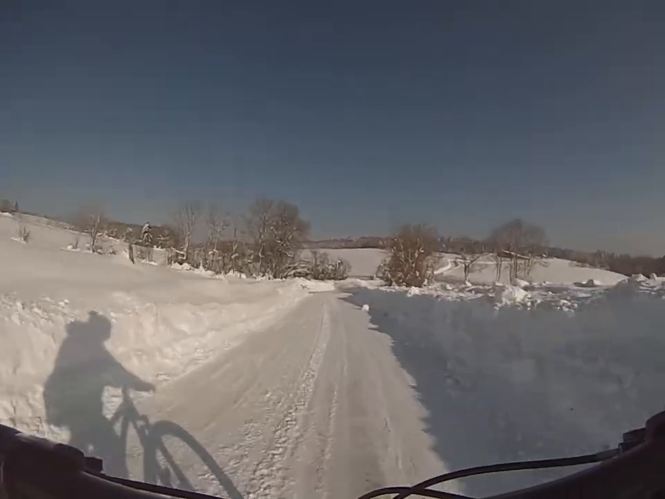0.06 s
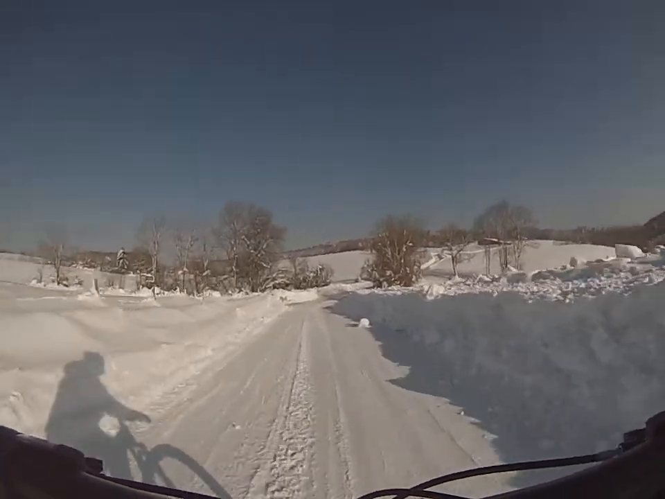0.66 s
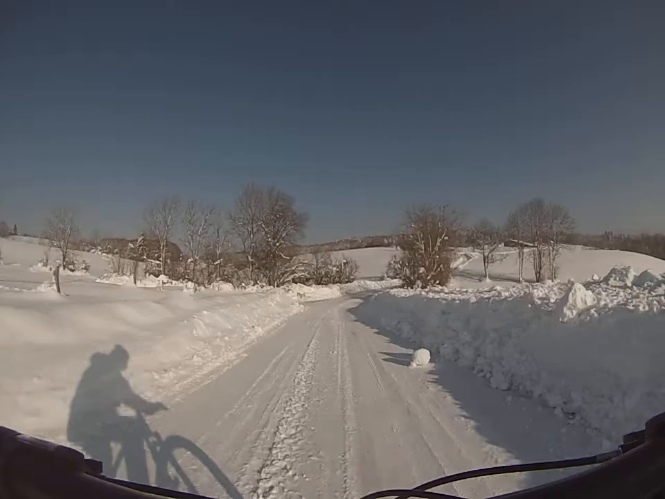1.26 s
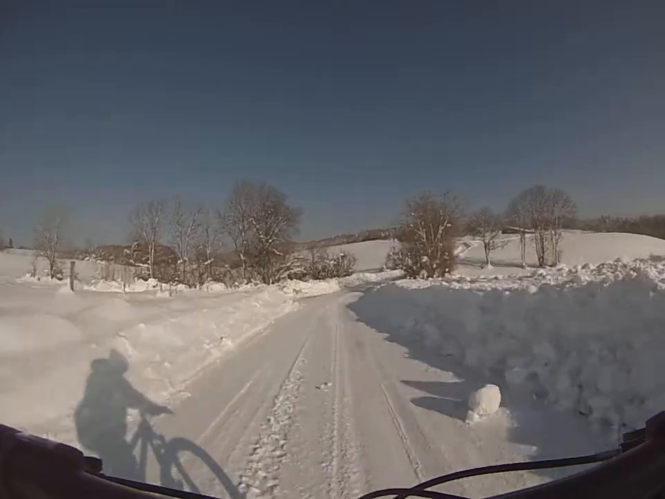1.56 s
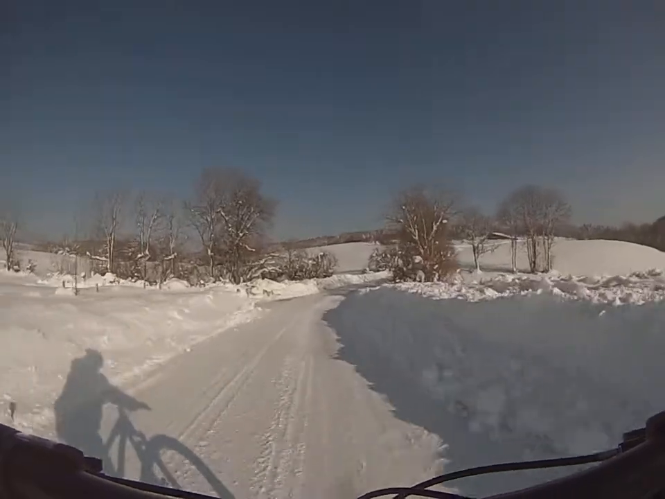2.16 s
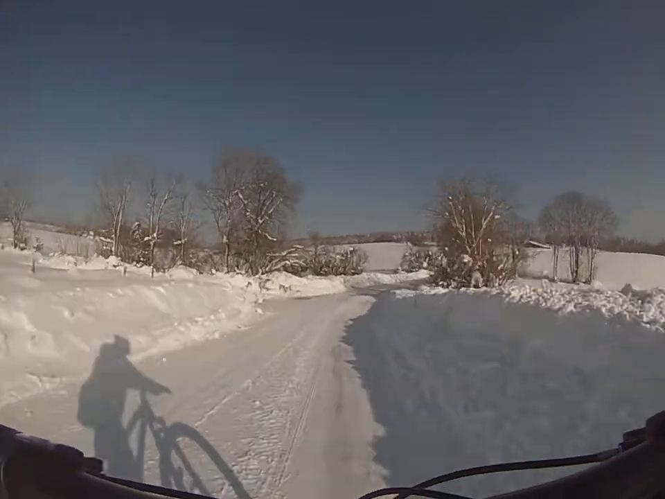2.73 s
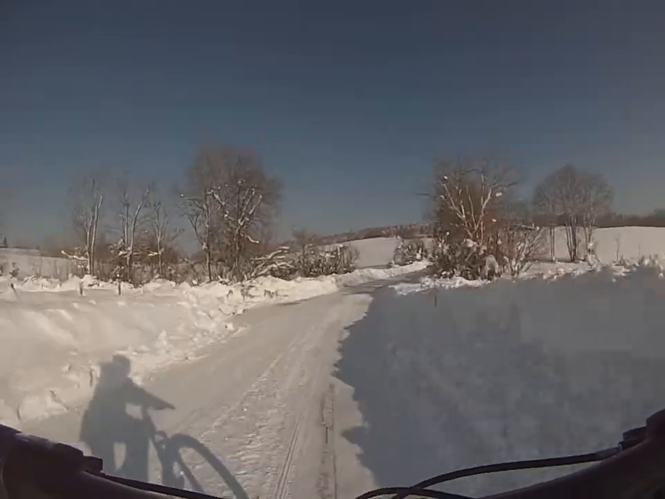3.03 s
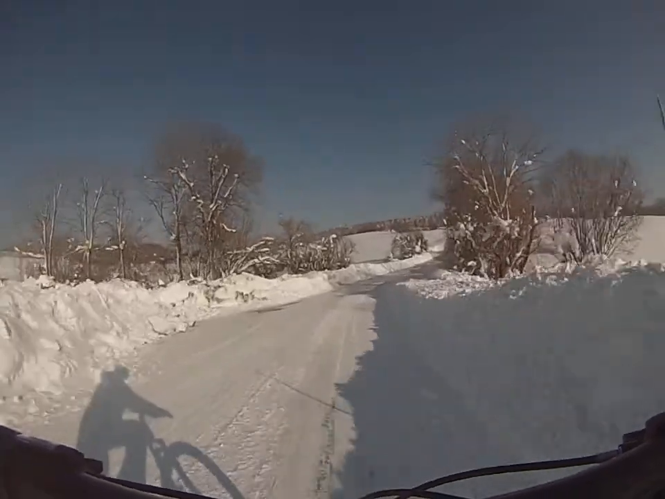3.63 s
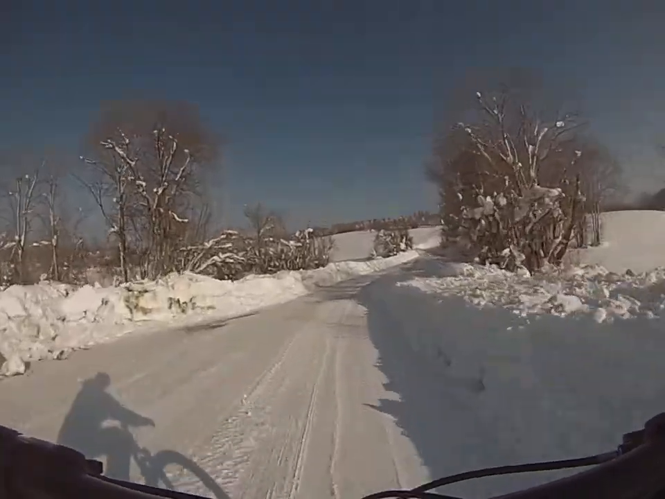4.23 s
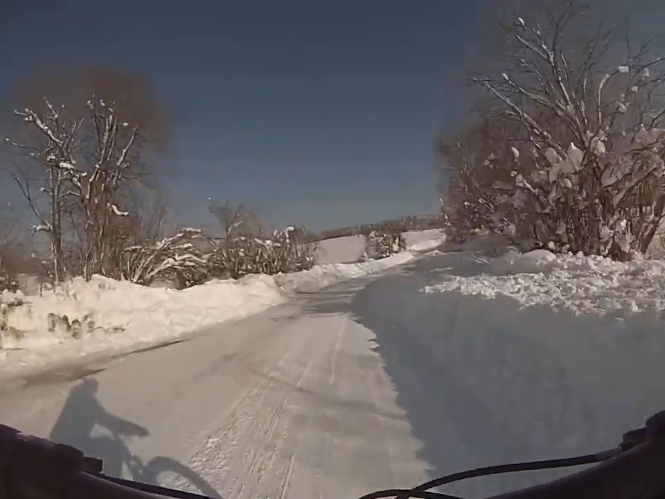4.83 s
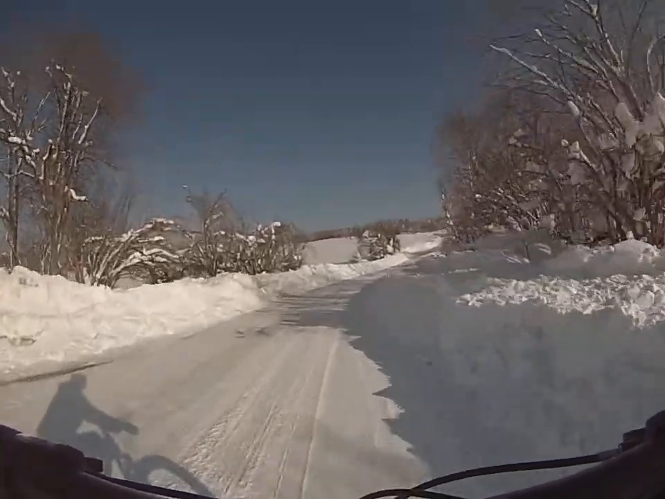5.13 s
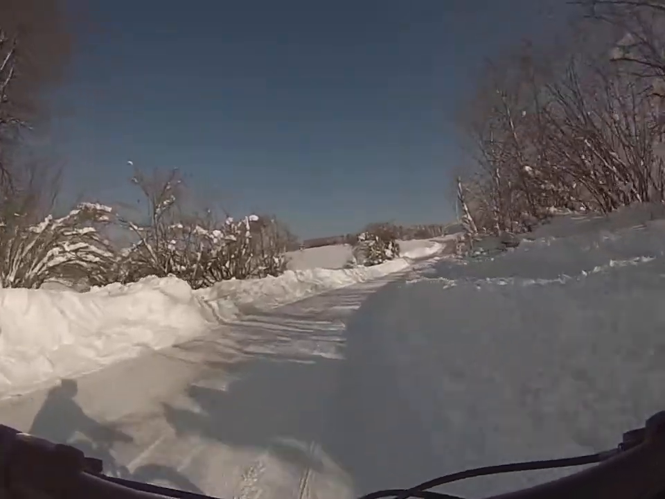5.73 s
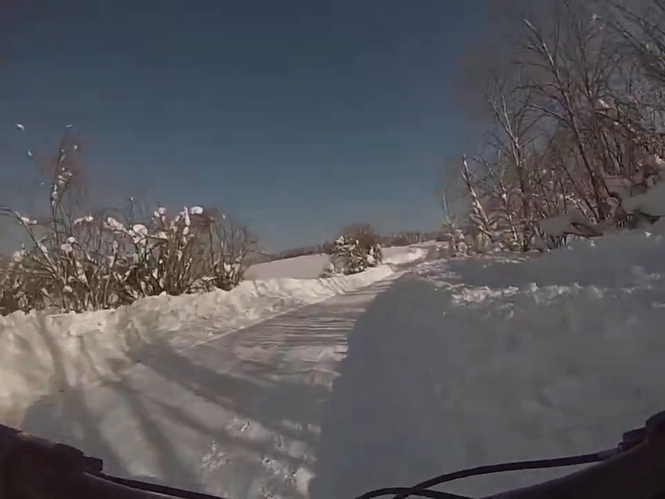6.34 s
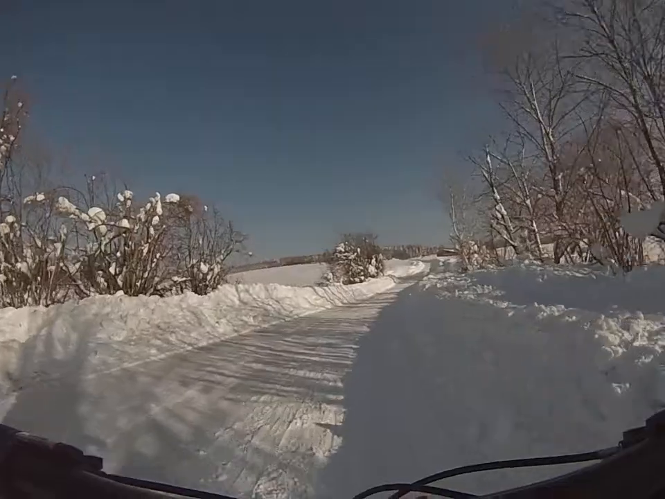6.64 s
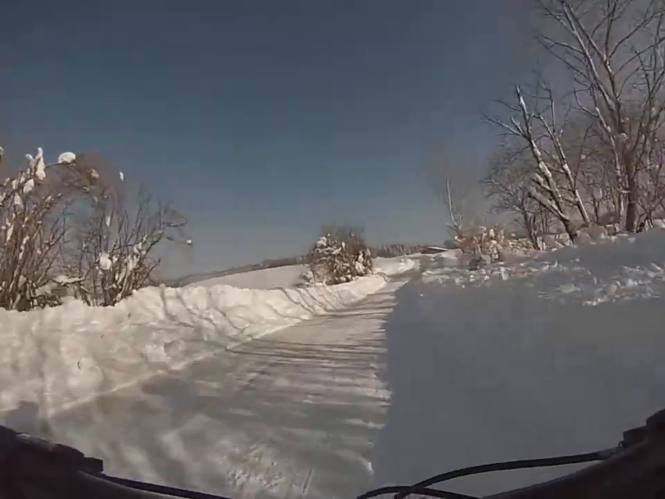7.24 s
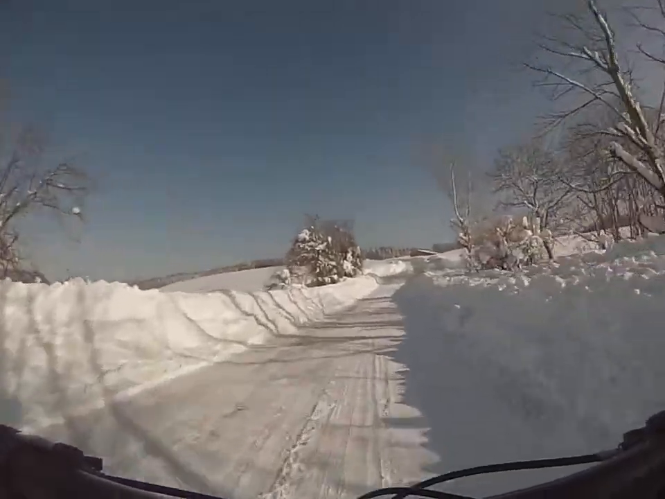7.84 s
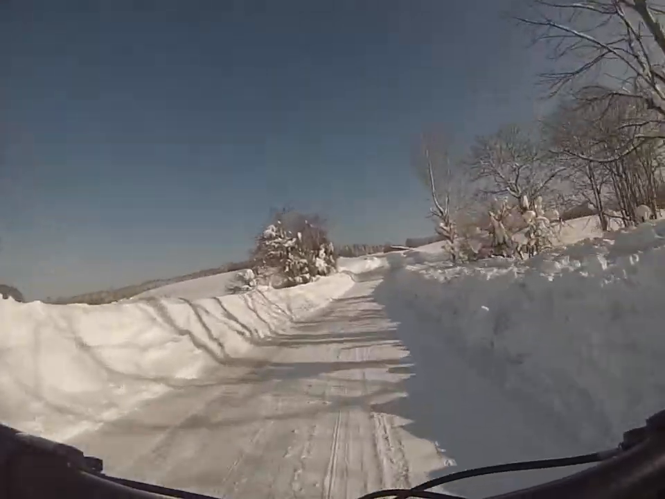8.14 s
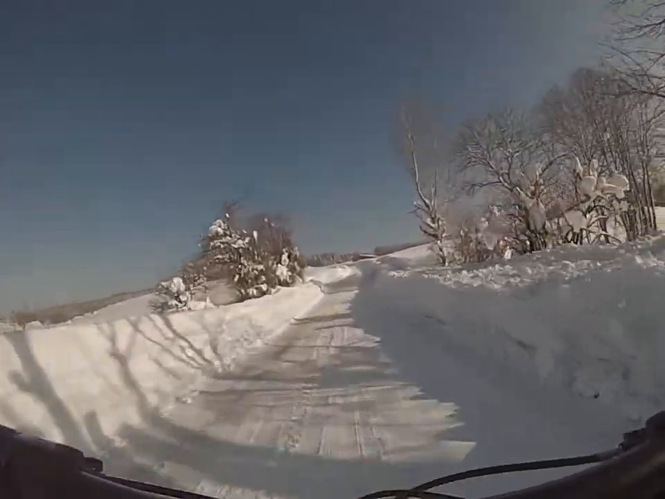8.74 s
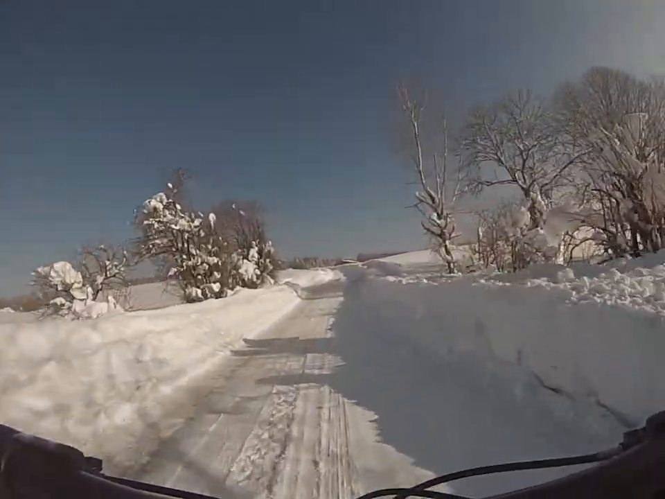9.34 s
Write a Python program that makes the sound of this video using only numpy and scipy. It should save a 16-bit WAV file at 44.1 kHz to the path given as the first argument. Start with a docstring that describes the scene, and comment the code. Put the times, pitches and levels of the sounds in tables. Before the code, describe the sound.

A bicycle rolls over packed snow for about nine and a half seconds, heard from a mount on its handlebar. A loud, low rumble runs from start to finish, with a deep, fast shudder that swells in closely spaced bouts. The plastic mount creaks on the stronger shakes and gives a few sharp ticks. Beneath this are a wavering tyre hum, soft crunching snow and a constant light chatter of fittings. Loose metal jingles irregularly, most clearly near 0.2, 1.8, 3.6 and 5 seconds. Cables and levers clack dryly, hardest around 0.2, 7, 8.3 and 9.5 seconds. Ruts give dull thuds at roughly 0.8, 3.6, 4.6, 5.4, 6.6, 7.5 and 9.4 seconds. Just before 6 seconds the tyre hum briefly rises in pitch, then settles as the ride carries on.

```python
"""A bicycle rolls over packed snow, heard from a housing mounted on its handlebar.
From the start the rough track drives the mount into bouts of oscillation near 33 Hz, and stick-slip
friction makes its joint creak on the wide swings. Beneath this the housing rumbles, tyre and fork hum
and snow crunches through the frame. Within the first second loose metal jingles, fittings knock, the
joint snaps and a rut gives a thud; all recur irregularly. Near 6 s the tyre hum briefly rises in pitch."""
import sys
import numpy as np
from scipy import signal
from scipy.fft import rfft, irfft, next_fast_len
from scipy.io import wavfile
from scipy.ndimage import uniform_filter1d

SR = 44100
rng = np.random.default_rng(int(sys.argv[2]) if len(sys.argv) > 2 else 0)


def dump_mix(stems):
    """Bounce the given channels to the path in sys.argv[1] as a 16-bit WAV at rate SR."""
    frames = np.atleast_2d(stems).T  # one column per channel
    limited = np.clip(frames, -1, 1)  # hard clip at full scale
    pcm = np.round(limited * 32767).astype(np.int16)
    wavfile.write(sys.argv[1], SR, pcm)


N = 422919


def from_db(db):
    """Decibels to amplitude ratio."""
    return 10 ** (np.asarray(db) / 20)


def rms_one(x):
    """Normalisation to unit rms."""
    return x / np.sqrt(np.mean(x ** 2) + 1e-20)


def in_time(rows):
    """Linear interpolation of (time, value) rows at every sample."""
    return np.interp(np.arange(N) / SR, *np.transpose(rows))


def drift(hz):
    """Low-passed Gaussian noise: a slow fluctuation of unit rms."""
    step, settling = 40, 2000
    pole = np.exp(-2 * np.pi * step * hz / SR)
    noise = rng.standard_normal(N // step + settling + 2)
    slow = signal.lfilter([1], [1, -2 * pole, pole * pole], noise)[settling:]
    return np.interp(np.arange(N) / step, np.arange(len(slow)), rms_one(slow))


def coloured(x, spectrum):
    """Minimum-phase filtering to a given spectrum, by folding the cepstrum."""
    size = next_fast_len(N + SR, True) // 2 * 2
    hz, db = np.transpose(spectrum)
    grid = np.arange(size // 2 + 1) * SR / size
    gain = from_db(np.interp(np.log(grid + 1), np.log(hz), db))
    cepstrum = irfft(np.log(gain))
    cepstrum[1:size // 2] *= 2
    cepstrum[size // 2 + 1:] = 0
    return irfft(rfft(x, size) * np.exp(rfft(cepstrum)))[:N]


def cut(x, hz, kind, order=2):
    """Butterworth low- or high-pass."""
    return signal.sosfilt(signal.butter(order, hz, kind, fs=SR, output="sos"), x + 1e-18)


def resonance(x, hz, width):
    """A damped oscillator with unit gain at resonance."""
    r = np.exp(-np.pi * width / SR)
    feedback = [1, -2 * r * np.cos(2 * np.pi * hz / SR), r * r]
    return signal.lfilter(np.array([1, 0, -1]) * (1 - r * r) / 2, feedback, x + 1e-18)


def body(force, modes):
    """Modal superposition: every contact drives each mode with a random strength and sign."""
    return sum(from_db(db) * resonance(force * rng.standard_normal(len(force)), hz, width)
               for hz, width, db in modes)


def grains(per_s, spread_db):
    """A Poisson process of impulses of uneven size."""
    sizes = from_db(spread_db * np.clip(rng.standard_normal(N), -2, 2))
    return (rng.random(N) < per_s / SR) * sizes


def fading(clicks, decay_s):
    """Exponential decay after each impulse."""
    return signal.lfilter([1], [1, -np.exp(-1 / (decay_s * SR))], clicks + 1e-18)


def evened(x, span_s):
    """Division by the running rms steadies the level and keeps finer detail."""
    size = int(span_s * SR)
    power = uniform_filter1d(uniform_filter1d(x ** 2, size), size)
    return x / np.sqrt(np.abs(power) + np.mean(x ** 2) / 100)


def blows(events, respond, peak_samples=480):
    """Impulse responses, each scaled to the peak level of its event."""
    starts = [int(s * SR) for s, db in events]
    clicks = np.zeros(N)
    clicks[starts] = 1
    sound, gain = respond(clicks), np.zeros(N)
    for start, (s, db) in zip(starts, events):
        gain[start:] = from_db(db) / np.abs(sound[start:start + peak_samples]).max()
    return sound * gain


# Bouts of bouncing: (start [s], end [s], relative swing level [dB], relative creak level [dB])
BOUNCE_BOUTS = [(-0.054, 0.042, -8.0, -53), (0.244, 0.931, -10.5, -59.5), (1.215, 1.577, -9.0, -56),
                (1.625, 1.691, -11, -54), (1.918, 2.189, -8.5, -58.5), (2.244, 2.414, -8.5, -56.5),
                (2.476, 2.737, -9.0, -56), (2.819, 2.912, -9.5, -57.5), (2.988, 3.467, -10.0, -56),
                (3.527, 4.448, -11.0, -57), (4.485, 4.681, -9, -55.5), (4.767, 5.025, -9.5, -57.5),
                (5.258, 5.682, -9.5, -56.5), (5.703, 5.947, -10, -59.5), (6.035, 6.346, -9.5, -59),
                (6.365, 6.562, -9, -56.5), (6.599, 7.928, -10, -56.5), (8.044, 8.388, -9, -60),
                (8.481, 8.804, -10, -62), (8.811, 9.366, -11.5, -58), (9.379, 9.528, -12, -59)]
def bouts(build_s=0.044, decay_s=0.055, creak_power=8.7):
    """Envelopes of a driven, damped oscillation and of its creak, which grows steeply with the swing."""
    t = np.arange(N) / SR
    swing, creaking = from_db(-16.5), from_db(-67.5)   # floors between bouts
    for start, end, swing_db, creak_db in BOUNCE_BOUTS:
        shape = np.clip((t - start) / build_s, 0, 1) * np.exp(-np.clip((t - end) / decay_s, 0, 10))
        swing = np.maximum(swing, from_db(swing_db) * shape)
        creaking = np.maximum(creaking, from_db(creak_db) * shape ** creak_power)
    return swing, creaking


# Bumps out of step that briefly check the swing: (time [s])
SWING_CHECKS = [0.631, 0.801, 0.959, 1.129, 1.651, 2.049, 5.071, 5.14, 6.201, 6.561, 7.02, 7.41, 7.48, 8.44,
                8.68]
def bounce(level, hz=32.8, check_s=0.022, check_db=-10):
    """Resonance: the mount swings near its natural frequency, losing step when the swing is weak."""
    t = np.arange(N) / SR
    checked = sum(np.exp(-np.minimum(((t - s) / check_s) ** 2, 20)) for s in SWING_CHECKS)
    swing = level * from_db(0.65 + 0.8 * drift(12) + check_db * checked)
    weakness = np.clip(np.median(swing) / swing, 0, 2) ** 2
    rate = hz * (1 + 0.06 * drift(3) + 0.1 * weakness * drift(15))
    phase = 2 * np.pi * np.cumsum(rate) / SR
    return np.sqrt(2) * swing * np.sin(phase), phase


# Buffeting of the housing: (frequency [Hz], relative spectral density [dB])
BUFFET_SPECTRUM = [(18, 7.5), (45, 0.5), (62, -3.5), (80, -5.5), (105, -7), (130, -11.5), (180, -15),
                   (300, -23.5), (480, -29), (600, -36)]
def rumble(level, bumps):
    """Random forcing: bumps and passing air buffet the housing, more so when it swings widely."""
    noise = coloured(rng.standard_normal(N), BUFFET_SPECTRUM)
    noise = cut(cut(noise, 546, "low", order=4), 22.2, "high")
    return from_db(-27.0 + 2.85 * bumps) * rms_one(evened(noise, span_s=0.12) * level ** 0.34)


# One slip of the plastic joint: (frequency [Hz], relative spectral density [dB])
SLIP_SPECTRUM = [(1500, -16), (3400, 0), (4400, -7.5), (5000, -5.5), (5800, -2), (6700, -7), (7400, -9),
                 (8700, -16), (10300, -18), (12000, -24.5), (15500, -29)]
def slips(clicks):
    """A brief release of friction radiates a broadband tick."""
    bursts = fading(clicks, decay_s=0.00024) * rng.standard_normal(N)
    return cut(coloured(bursts, SLIP_SPECTRUM), 1900, "high")


def hard_slips(clicks):
    """A hard slip has its energy at higher frequencies than a small one."""
    return cut(slips(clicks), 3800, "high")


def creak(level, creaking, phase, grip=4.2):
    """Stick-slip friction: the joint slips at both velocity peaks of a cycle, more one way."""
    velocity = np.cos(phase)
    sliding = velocity ** 2 * (level / np.median(level)) * from_db(1.4 * velocity)
    looseness = from_db(4.4 * np.clip(drift(20.5), -2, 1))   # the joint grips and lets go by turns
    soft = cut(slips(grains(2600 * sliding, 10.2) * np.sqrt(sliding)), 11500, "low", order=3)
    # now and then a release sets off a dense run of hard slips
    releases = fading(grains(125 * sliding, 4.1), decay_s=0.0018)
    hard = hard_slips(grains(5000 * np.minimum(releases, 1), 7.0) * np.sqrt(releases))
    ticks = evened((soft + from_db(11.0) * hard) * looseness, span_s=0.14)
    # no run can release more than the joint's grip holds
    ticks = ticks / np.sqrt(1 + uniform_filter1d(ticks ** 2, size=130) / grip ** 2)
    return from_db(6.5 + 1.5 * drift(2.0)) * creaking * ticks


# Tyre resonances: (frequency [Hz], bandwidth [Hz], gain [dB])
TYRE_RESONANCES = [(228.9, 12.6, 4), (246.9, 16.5, -1.5)]
# Glide of the hum: (time [s], relative pitch [ratio])
TYRE_GLIDE = [(5.3, 1.033), (5.75, 1.1), (6.3, 1)]
# Roughness of the snow, heard as tyre hum: (time [s], relative level [dB])
TYRE_LEVELS = [(0.0, -25.5), (0.6, -27), (0.95, -28.5), (1.28, -21), (1.37, -38), (1.49, -24.5),
               (2.22, -22), (2.31, -27.5), (2.8, -27.5), (2.93, -18.5), (3.2, -24.5), (3.3, -21),
               (3.38, -30), (3.65, -21), (3.75, -32.5), (3.96, -23.5), (4.12, -34), (4.42, -25),
               (5.22, -26), (5.47, -32.5), (5.8, -24), (6.05, -22), (6.75, -37), (7.25, -36), (7.38, -26.5),
               (7.9, -28.5), (8.08, -22.5), (8.51, -31.5), (8.57, -20), (8.77, -33), (8.88, -20),
               (9.08, -34.5), (9.5, -30), (9.59, -23)]
def tyre_hum(tread_force):
    """Forced vibration: tread blocks drumming on the snow excite the modes of the tyre."""
    hum = cut(cut(body(tread_force, TYRE_RESONANCES), 339, "low", order=4), 162, "high", order=3)
    pitch = in_time(TYRE_GLIDE) + 0.01184 * drift(3.5)
    hum = np.interp(np.cumsum(pitch / pitch.mean()) - 1, np.arange(N), hum)   # resampling bends the pitch
    return from_db(in_time(TYRE_LEVELS) + 0.53) * evened(hum, span_s=0.098)


# Fork resonances: (frequency [Hz], bandwidth [Hz], gain [dB])
FORK_RESONANCES = [(288, 27, -16), (360, 96, -12), (400, 32, 1.5), (455.3, 33, 2), (480.4, 34, -7)]
# Swell of the fork's hum along the track: (time [s], relative level [dB])
FORK_LEVELS = [(0.0, -32), (1.1, -37), (1.28, -30.5), (1.35, -41.5), (1.8, -32), (3.55, -36), (4.22, -42.5),
               (4.4, -35.5), (5.16, -36), (5.5, -42.5), (6.03, -31), (6.76, -47.5), (8.07, -35.5),
               (9.2, -42), (9.59, -36.5)]
def fork_hum(tread_force):
    """Mechanical coupling: the same tread force excites the higher modes of the fork."""
    hum = cut(cut(body(tread_force, FORK_RESONANCES), 486, "low", order=7), 220, "high")
    return from_db(in_time(FORK_LEVELS)) * evened(hum, span_s=0.18)


# Frame and handlebar resonances: (frequency [Hz], bandwidth [Hz], gain [dB])
FRAME_RESONANCES = [(613, 58, -1), (736, 36, -0.5), (876.5, 56, 2), (916, 45, -2), (1103.6, 39, 4.5),
                    (1143, 39, -1.5), (1247, 55, -4.5), (1540, 50, 0.5), (1633, 11, -3), (1795, 83, -8),
                    (1912, 15, -7.5)]
# Crunch along the track: (time [s], relative level [dB])
CRUNCH_LEVELS = [(0.05, -44), (0.21, -46), (1.12, -44.5), (1.4, -46.5), (1.78, -41), (2.45, -49),
                 (3.1, -46), (4.12, -49.5), (4.45, -46.5), (5.35, -44.5), (5.52, -49.5), (5.95, -45.5),
                 (6.8, -48.5), (8.0, -45), (9.3, -49.5), (9.59, -44)]
def crunch(bumps):
    """Structure-borne sound: snow crumbling under the tyres rings through the frame."""
    fractures = grains(1800, 5.7) * from_db(1.9 * bumps)
    frame = cut(body(fractures, FRAME_RESONANCES), 2200, "low", order=6)
    return from_db(in_time(CRUNCH_LEVELS) + 2.03) * evened(frame, span_s=0.58)


def hiss():
    """Faint broadband noise of snow and air."""
    return from_db(-66.0) * rms_one(cut(rng.standard_normal(N), 5100, "low", order=3))


# Main modes of the small metal parts: (frequency [Hz], bandwidth [Hz], gain [dB])
METAL_RESONANCES = [(1520, 50, -9.5), (1624, 24, -8.5), (1936, 11, -10.5), (2216, 36, -9), (2278, 14, 3.5),
                    (2345, 11, 0), (2396, 70, -8), (2822, 10, -3)]
# Their thin upper partials: (frequency [Hz], bandwidth [Hz], gain [dB])
METAL_OVERTONES = [(3020, 9.7, -19.5), (3610, 17, -21), (4630, 32, -20.5), (5330, 150, -38),
                   (6835, 50, -42), (8380, 90, -45.5)]
def metal(force, bright_db):
    """Lightly damped, inharmonic modes give small metal parts their ring."""
    main = cut(cut(body(force, METAL_RESONANCES), 2800, "low", order=6), 1100, "high", order=3)
    return main + from_db(bright_db) * body(force, METAL_OVERTONES)


# Jolts to the loose metal: (time [s], relative peak level [dB], decay time of the buzz [s])
METAL_JOLTS = [(0.058, -21, 0.0067), (0.195, -17.5, 0.033), (0.341, -24.5, 0.015), (0.979, -27, 0.027),
               (1.417, -27.5, 0.019), (1.69, -25, 0.011), (1.835, -15.5, 0.022), (1.972, -25, 0.028),
               (2.011, -26.5, 0.0018), (2.7, -22, 0.0051), (2.96, -25.5, 0.019), (3.029, -26, 0.01),
               (3.091, -23, 0.0087), (3.24, -27, 0.028), (3.625, -20, 0.026), (3.899, -28, 0.014),
               (4.289, -28.5, .007), (4.383, -22, 0.015), (4.515, -22, 0.0076), (4.794, -20.5, 0.011),
               (4.895, -26, 0.019), (5.04, -20, 0.013), (5.13, -24, .015), (5.152, -24, .025),
               (6.131, -21.5, 0.017), (6.776, -28.5, 0.0049), (7.588, -29, 0.0039), (7.91, -27.5, 0.055),
               (8.035, -25, 0.0053), (8.149, -25, 0.008), (8.19, -25, 0.012), (8.472, -26.5, 0.0063),
               (8.556, -25.5, 0.012)]
def jingle(shake_db, rise_s=0.0018):
    """Forced, then free vibration: jolted metal buzzes on its seat and rings on; otherwise it stirs."""
    t, chinks = np.arange(SR // 3) / SR, np.zeros(N + SR)
    for s, db, buzz_s in METAL_JOLTS:
        force = (1 - np.exp(-t / rise_s)) * np.exp(-t / buzz_s)
        ring = metal(force, bright_db=0.27 * (db + 17.5))   # harder jolts are brighter
        start = int(s * SR)
        chinks[start:start + len(t)] += from_db(db) * ring / np.abs(ring).max()
    stirring = evened(metal(grains(60, 0.9), bright_db=0.5), span_s=0.23)
    return from_db(-2.5) * chinks[:N] + from_db(shake_db - 3.0) * stirring


# How hard the track shakes the fittings: (time [s], relative level [dB])
SHAKE_LEVELS = [(0.08, -48.5), (0.45, -42.5), (1.0, -46), (1.38, -45.5), (1.78, -42), (2.38, -47),
                (3.1, -46), (3.75, -49.5), (4.18, -49), (4.7, -47.5), (5.32, -43.5), (5.66, -53.5),
                (5.94, -44), (6.74, -47.5), (7.1, -43), (7.8, -46), (8.18, -45.5), (9.2, -45),
                (9.58, -45.5)]
def shaking(jolt_db=6.5, decay_s=0.05):
    """Base excitation in dB: the track shakes the frame, and each jolt adds a decaying transient."""
    s, db, _ = np.transpose(METAL_JOLTS)
    clicks = np.zeros(N)
    clicks[(s * SR).astype(int)] = from_db(db - db.max())
    jolts = np.minimum(fading(clicks, decay_s), 1)
    return in_time(SHAKE_LEVELS) + jolt_db * (jolts - jolts.mean())


# Cable and lever resonances: (frequency [Hz], bandwidth [Hz], gain [dB])
FITTING_RESONANCES = [(1608, 155, -8), (2133, 140, -9.5), (2297, 100, -5), (2497, 97, -5),
                      (2686, 120, -8.5), (3670, 370, -20)]
def fittings(clicks, rise_s, decay_s):
    """A contact force builds and lets go; heavily damped cables and levers answer with a dry clack."""
    force = fading(fading(clicks, rise_s), decay_s)
    return cut(cut(body(force, FITTING_RESONANCES), 2900, "low", order=7), 1100, "high")


def chatter(shake_db, bumps):
    """Intermittent contact: loose fittings tap all along, more often on bumps."""
    taps = fittings(grains(380 * from_db(3.5 * bumps), 1.4), rise_s=0.00046, decay_s=0.0014)
    return from_db(shake_db + 0.73 + 0.59 * drift(11.0)) * evened(taps, span_s=0.19)


# Fittings striking the handlebar: (time [s], relative peak level [dB])
FITTING_KNOCKS = [(0.2154, -15), (0.722, -27), (0.799, -18), (0.818, -18), (2.1416, -22.5), (2.9974, -17),
                  (3.3285, -18.5), (3.6498, -19), (3.851, -19), (5.3003, -18), (5.4031, -19),
                  (5.564, -21.5), (5.5917, -17.5), (6.604, -23), (6.8803, -21), (7.0284, -11.5),
                  (7.104, -17), (7.1331, -21), (7.2548, -18.5), (7.439, -18), (8.319, -16), (8.555, -18),
                  (9.2522, -19.5), (9.327, -23.5), (9.4938, -19.5), (9.5364, -18), (9.548, -13.5)]
def knocks():
    """Impact excitation: larger bumps throw the fittings into harder, longer contact."""
    strikes = blows(FITTING_KNOCKS, lambda clicks: fittings(clicks, rise_s=0.0005, decay_s=0.0047))
    return from_db(-4.0) * strikes


# Sharp slips of the joint: (time [s], relative peak level [dB])
JOINT_SNAPS = [(0.378, -33), (0.6579, -28), (0.745, -30.5), (0.8305, -30.5), (1.9764, -38.5), (4.6239, -31),
               (5.3183, -27), (6.6523, -31.5), (6.8423, -28), (6.8553, -27), (7.0694, -27), (7.4383, -28.5),
               (9.1219, -24.5)]
def snaps():
    """A single stick-slip release gives an isolated, bright transient."""
    return from_db(1.0) * blows(JOINT_SNAPS, lambda clicks: hard_slips(fading(clicks, decay_s=0.0011)))


# The wheel drops over a rut: (time [s], relative peak level [dB])
RUT_DROPS = [(0.826, -8), (3.646, -8), (4.645, -10), (5.416, -11), (6.574, -8), (7.546, -8), (9.447, -11.5)]
def thuds():
    """Impulse response: each rut pushes one low, quickly damped mode of the frame."""
    drops = blows(RUT_DROPS, lambda clicks: cut(resonance(clicks, 71.4, width=32), 260, "low", order=3))
    return from_db(-4.0) * drops


def scene():
    """Superposition at the handlebar; the same small bumps modulate rumble, tyres and chatter."""
    level, creaking = bouts()
    shake_db, bumps = shaking(), drift(20)
    swing, phase = bounce(level)
    mount = swing + rumble(level, bumps) + creak(level, creaking, phase) + snaps()
    tread_force = grains(2500, 1.9) * from_db(3.36 * bumps)
    rolling = tyre_hum(tread_force) + fork_hum(tread_force) + crunch(bumps) + hiss() + thuds()
    loose_parts = chatter(shake_db, bumps) + knocks() + jingle(shake_db)
    return (mount + rolling + loose_parts)[None]


def record(dry, cutoff_hz=15800):
    """Band limiting: a steep elliptic low-pass removes the highest treble."""
    return signal.sosfilt(signal.ellip(10, 0.1, 80, cutoff_hz, fs=SR, output="sos"), dry)


dry = scene()
out = record(dry)
dump_mix(out)
```